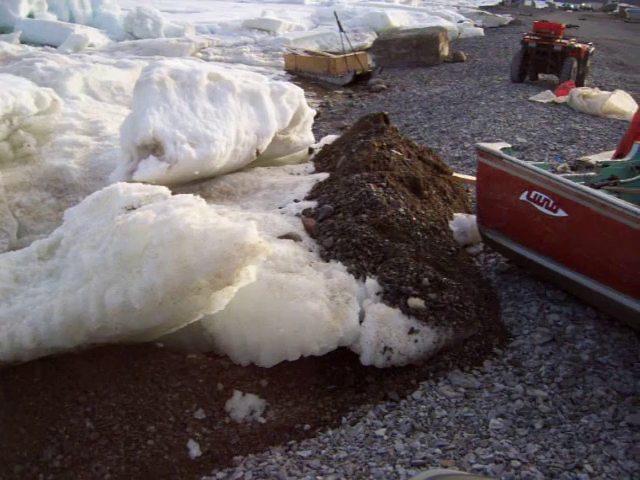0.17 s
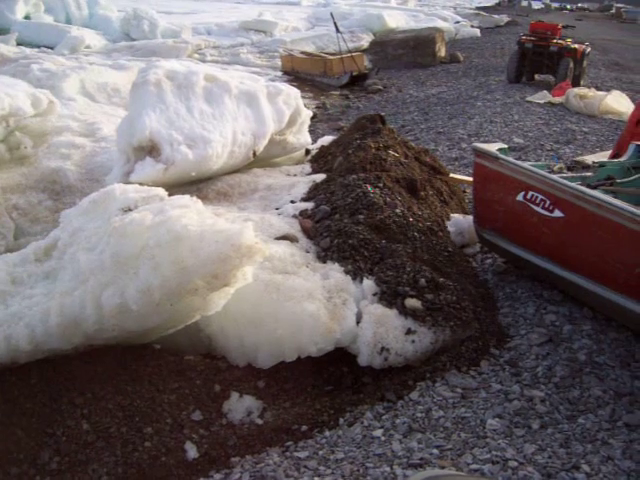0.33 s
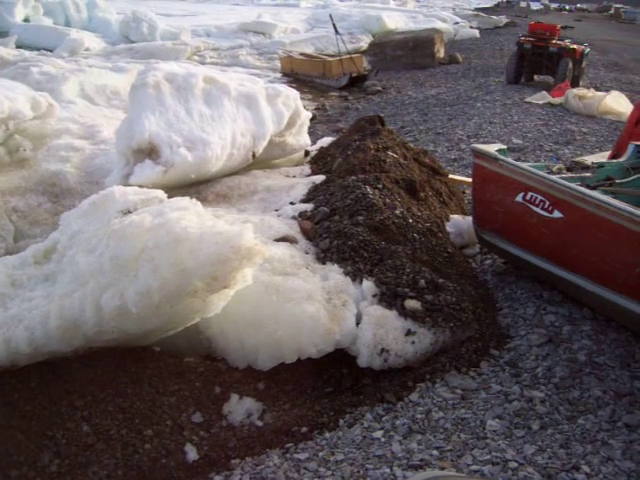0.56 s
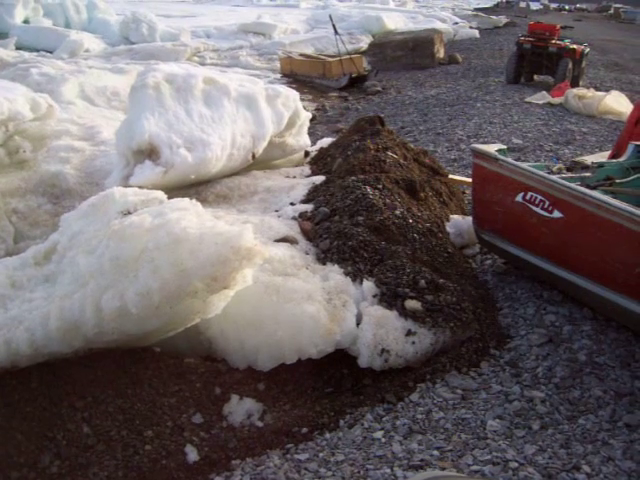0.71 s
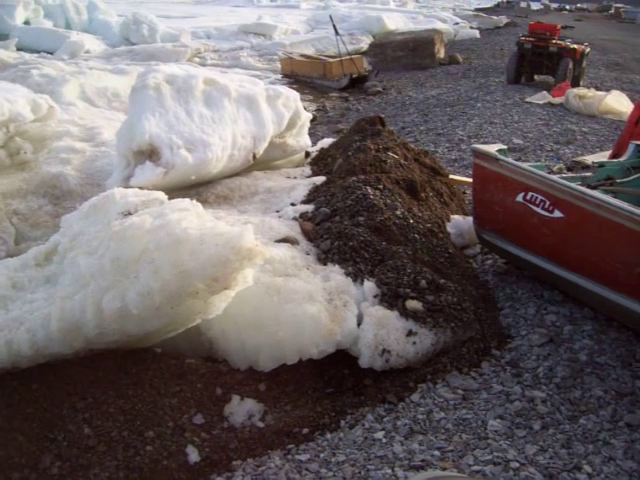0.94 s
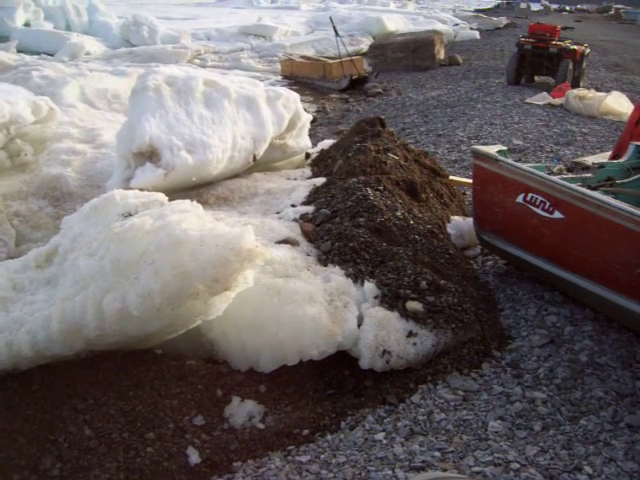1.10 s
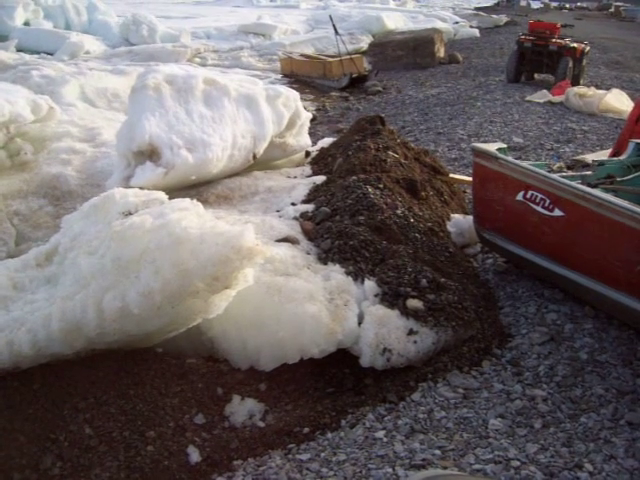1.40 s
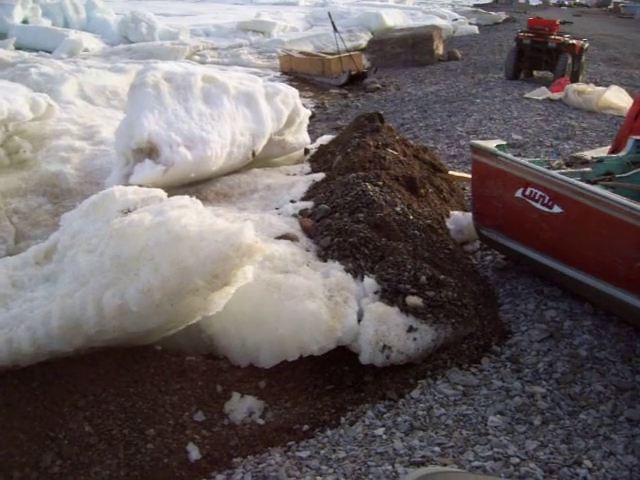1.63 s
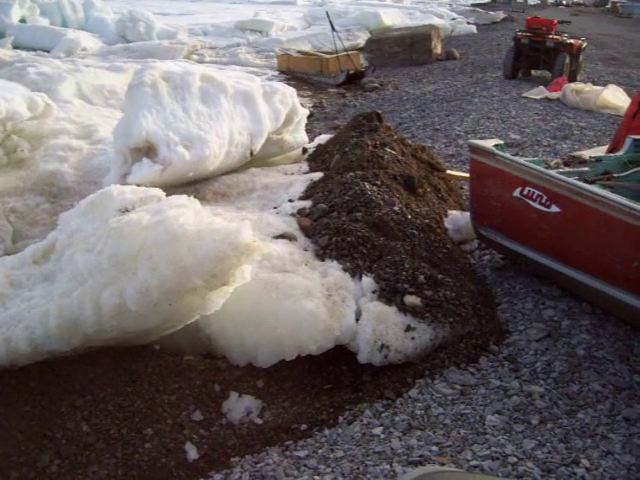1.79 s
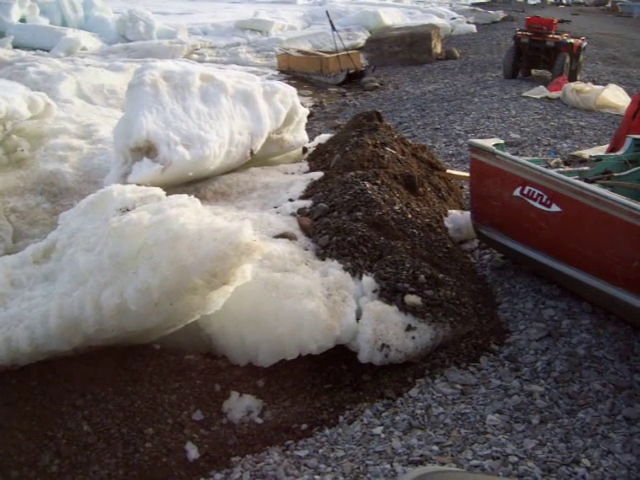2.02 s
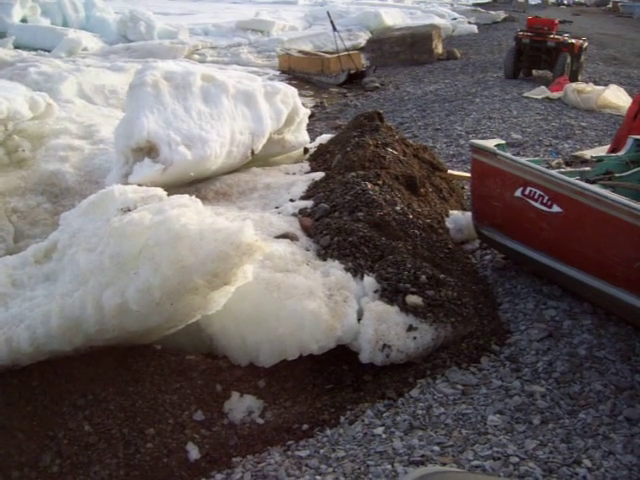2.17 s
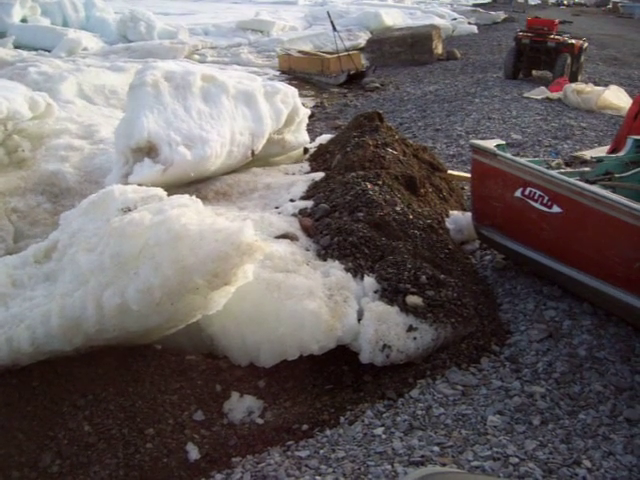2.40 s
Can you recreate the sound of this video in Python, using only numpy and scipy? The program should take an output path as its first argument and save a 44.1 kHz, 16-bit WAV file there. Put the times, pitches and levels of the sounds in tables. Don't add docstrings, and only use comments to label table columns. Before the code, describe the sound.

Gravel shoved by ice grinds and slides throughout, a quiet low rumble under a grainy pebble hiss. Bright small clicks and tiny rattles scatter close by, with soft buried thuds. Scrapes come near 0.9 and 1.25 seconds, a stony crack at 1.34, a sharp click at 1.43, a dull hollow hull knock at 1.64, another sharp click at 1.72, a low thud near 2.3, then sparser ticks until 2.5.

```python
import sys
import numpy as np
from scipy import signal
from scipy.fft import rfft, irfft, next_fast_len
from scipy.io import wavfile
from scipy.ndimage import uniform_filter1d, map_coordinates

SR = 44100
rng = np.random.default_rng(int(sys.argv[2]) if len(sys.argv) > 2 else 0)


def attenuation_scalar(level_db):
    decades = np.asarray(level_db, float) / 20
    return 10 ** decades


def waveform_to_disk(signal):
    frames = np.transpose(np.atleast_2d(signal))
    scaled = np.clip(frames, -1, 1) * 32767
    samples = np.round(scaled).astype(np.int16)
    wavfile.write(sys.argv[1], SR, samples)


N = 112454
SLIDE_STEADY_DB = -41.5


def unit(x):
    return x / np.sqrt(np.mean(x ** 2) + 1e-20)


def wobble(rate_hz):
    return map_coordinates(rng.standard_normal(400), [np.arange(N) * rate_hz / SR])


def filtered(x, response):
    size = next_fast_len(N + 8192)
    spectrum = rfft(x, size) * response(np.fft.rfftfreq(size, 1 / SR))
    return irfft(spectrum, size)[..., :N]


def coloured(x, points):
    point_hz, point_db = np.transpose(points)
    hz = np.fft.rfftfreq(8192, 1 / SR)
    db = np.interp(np.log(hz + 1), np.log(point_hz + 1), np.maximum(point_db, -90))
    cepstrum = irfft(db * np.log(10) / 20)
    cepstrum[1:4096] *= 2
    cepstrum[4097:] = 0
    impulse = irfft(np.exp(rfft(cepstrum)))
    return unit(signal.fftconvolve(x, impulse)[:N])


def contacts(count, spread_db, patchy_db, smooth_db):
    spectrum = signal.stft(rng.standard_normal(N), nperseg=256)[2]
    patches = uniform_filter1d(rng.standard_normal(spectrum.shape), size=6, axis=0)
    patches = uniform_filter1d(patches, size=8, axis=1)
    far = signal.istft(spectrum * attenuation_scalar(patchy_db * unit(patches)), nperseg=256)[1][:N]
    when, way, size = rng.random((count, 3)).T
    push = np.sign(way - .5) * attenuation_scalar(-spread_db * np.log(1 - .98 * size))
    near = np.bincount((when * N).astype(int), push, N)
    return unit(near) + attenuation_scalar(smooth_db) * unit(far)


def rings(s, db, hz, cycles, length):
    turns = np.arange(length) / SR * hz[:, None]
    swell = turns / cycles * np.exp(1 - turns / cycles)
    wave = attenuation_scalar(db)[:, None] * np.sin(2 * np.pi * turns) * swell
    at = np.clip((s * SR).astype(int), 0, N)[:, None] + np.arange(length)
    return np.bincount(at.ravel(), wave.ravel(), N + length + 1)[:N]


def tumble(rows, count, spread, fade_db):
    s, db, hz, length_s = np.transpose(rows)[:, :, None]
    jitter, size, pitch = rng.random((len(rows), count, 3)).transpose(2, 0, 1)
    late = (np.arange(count) + jitter) / count
    tap_db = db - 3 - fade_db * late - 8 * size
    tap_hz = hz * np.exp(spread * (2 * pitch - 1))
    return rings((s + length_s * late).ravel(), tap_db.ravel(), tap_hz.ravel(), cycles=1.7, length=400)


# time in seconds, grinding level in dB, sliding level in dB.
SHOVE_CURVE = [(0.0, -39, -41), (0.13, -39, -42), (0.42, -37, -42), (0.88, -38, -41), (1.11, -37, -39),
               (1.37, -37, -39), (1.47, -36, -39), (1.74, -38, -43), (1.91, -39, -42), (2.13, -39, -41),
               (2.23, -39, -43), (2.55, -38, -43)]
# frequency in Hz, level in dB per Hz.
GRIND_SPECTRUM = [(15, -58), (25, -8), (54, -5), (294, -1.5), (393, -3.5), (497, -6.5), (1160, -12.5),
                  (1900, -22.5), (2470, -55.5), (4180, -120)]
# frequency in Hz, level in dB per Hz.
SLIDE_SPECTRUM = [(880, -29), (1500, -3), (1860, -5), (2280, 0.5), (3490, -1.5), (6150, 0.5), (7470, -6),
                  (8480, -15.5), (8930, -24.5), (11600, -67.5), (19600, -120)]


def gravel():
    s, low, high = np.transpose(SHOVE_CURVE)
    t = np.arange(N) / SR
    shared = .5 * wobble(15)
    grind = coloured(contacts(count=1500, spread_db=3.5, patchy_db=1.0, smooth_db=2.5), GRIND_SPECTRUM)
    slide = coloured(contacts(count=9000, spread_db=5, patchy_db=2.0, smooth_db=-1), SLIDE_SPECTRUM)
    grind_db = np.interp(t, s, low) + 2 + shared + 1.4 * wobble(30.8)
    slide_db = SLIDE_STEADY_DB + 0.45 * (np.interp(t, s, high) - SLIDE_STEADY_DB)
    slide_db = slide_db + shared + .8 * wobble(45)
    return attenuation_scalar(grind_db) * grind + attenuation_scalar(slide_db) * slide


# start in seconds, peak in dB, ring in Hz.
PEBBLE_SNAPS = [(0.4629, -25, 4270), (0.7362, -18.5, 6170), (0.8692, -17, 6300), (1.0332, -22.5, 6100),
                (1.2438, -17.5, 5500), (1.3144, -15, 6500), (1.3972, -16, 5660), (1.4286, -6, 5800),
                (1.477, -13.5, 6460), (1.7152, -6.5, 5800), (1.8095, -15, 6430), (1.923, -18, 5660),
                (2.0477, -22, 5660), (2.1677, -20, 6400)]
# delay in seconds, level in dB, pitch as a ratio.
STONE_ANSWERS = [
    (0, 0, 1),
    (.0008, -8, 1.06),
    (.0018, -17, .9),
    (.003, -19, 1.1),
]


def snaps():
    s, db, hz = np.transpose(PEBBLE_SNAPS)
    out = np.zeros(N)
    for late, loss, ratio in STONE_ANSWERS:
        out += rings(s + 0.0008 + late, db - 1 + loss, hz * ratio, cycles=0.96, length=200)
    return out


# start in seconds, peak in dB, ring in Hz, length in seconds.
PEBBLE_RATTLES = [(0.0203, -21, 7010, 0.006), (0.079, -23.5, 6450, 0.0077), (0.183, -21, 5640, 0.0046),
                  (0.3197, -23, 6430, 0.0081), (0.401, -26.5, 5070, 0.006), (0.462, -17.5, 6520, 0.006),
                  (0.587, -21, 5630, 0.011), (0.672, -21.5, 6870, 0.006), (0.7286, -22.5, 5670, 0.0046),
                  (0.9326, -19.5, 5900, 0.011), (0.973, -22, 5660, 0.0051), (1.1095, -29.5, 6100, 0.006),
                  (1.197, -28.5, 5840, 0.006), (1.303, -15.5, 6250, 0.0081), (1.6435, -15, 6420, 0.01),
                  (1.7755, -27, 5170, 0.006), (1.826, -26.5, 5220, 0.006), (2.014, -25.5, 6170, 0.006),
                  (2.078, -18, 6320, 0.0074), (2.166, -20, 6340, 0.006), (2.24, -24, 6110, 0.0051),
                  (2.2754, -16.5, 5600, 0.006), (2.398, -36, 6390, 0.006), (2.43, -24.5, 6280, 0.012)]


def rattles():
    return tumble(PEBBLE_RATTLES, count=14, spread=0.36, fade_db=12.5)


# start in seconds, peak in dB, ring in Hz, length in seconds.
PEBBLE_SCRAPES = [
    (.906, -21.5, 6000, .038),
    (1.25, -25, 6000, .05),
    (1.352, -32.5, 6000, .025),
    (1.412, -27, 6000, .01),
    (1.455, -41.5, 6500, .02),
    (1.568, -26, 6220, .022),
    (1.955, -29.5, 6000, .025),
    (2.17, -33, 4970, .018),
]


def scrapes():
    return tumble(PEBBLE_SCRAPES, count=50, spread=0.24, fade_db=4.0)


# start in seconds, peak in dB, ring in Hz, length in seconds.
STONE_CRACKS = [(.9645, -27, 2600, .004), (1.195, -30, 2600, .003), (1.335, -22, 5000, .001),
                (1.3361, -11, 5800, .002), (1.3362, -26, 3900, .0015), (1.3363, -24, 1900, .002),
                (1.3364, -12, 2850, .002), (1.4292, -22, 3000, .0008), (1.57, -25, 1300, .01),
                (1.6415, -17, 1100, .01), (1.644, -25, 2500, .006), (1.6445, -21, 5800, .005),
                (1.697, -28, 2600, .003), (1.986, -32, 2600, .006), (2.118, -32, 2400, .006)]


def cracks():
    return tumble(STONE_CRACKS, count=6, spread=0.13, fade_db=6)


# start in seconds, peak in dB, pitch in Hz.
BURIED_SLIPS = [(0.318, -20, 364), (0.619, -21, 270), (0.914, -23, 252), (0.931, -20, 352),
                (0.981, -22.5, 380), (1.219, -36, 400), (1.597, -20, 328), (1.755, -24, 248),
                (1.871, -24, 310), (1.97, -19, 330), (2.233, -22.5, 400), (2.291, -15.5, 350),
                (2.397, -26, 331)]


def thuds():
    s, db, hz = np.transpose(BURIED_SLIPS)
    push = rings(s + 0.0019, db - 2.5, hz, cycles=0.54, length=1500)
    edge = rings(s + 0.00283, db - 6.5, 2.3 * hz, cycles=0.54, length=1500)
    return push - edge


# start in seconds, peak in dB.
HULL_CONTACTS = [
    (1.6408, -17),
    (1.6427, -8),
    (1.6568, -18),
]
# frequency in Hz, level in dB, 60 dB decay in seconds.
HULL_MODES = [(181, 4, 0.037), (272, 2, 0.024), (729, -3, 0.037), (990, -7, 0.047), (1237, -7, 0.024),
              (1690, -29, 0.028), (2270, -16, 0.033), (2780, -15, 0.026)]


def knock():
    out = np.zeros(N + SR)
    t = np.arange(SR // 8) / SR
    damping, attack_s = .8, 0.00083
    ring = np.zeros(len(t))
    for hz, level, t60 in HULL_MODES:
        ring += attenuation_scalar(level - 60 * t / (t60 * damping)) * np.sin(2 * np.pi * hz * t)
    ring *= 1 - np.exp(-t / attack_s)
    for (s, db), way in zip(HULL_CONTACTS, (-1, 1, -1)):
        out[round(s * SR):][:len(t)] += way * attenuation_scalar(db) * ring
    return out[:N]


def crackle(count):
    s, _, high = np.transpose(SHOVE_CURVE)
    when, size, pitch, stretch = rng.random((count, 4)).T
    at = when * N / SR
    faster_db = np.interp(at, s, high) - SLIDE_STEADY_DB
    db = SLIDE_STEADY_DB + 4 + 2 * faster_db - 3 * np.log(1 - .95 * size)
    hz = 6000 * np.exp(.3 * (pitch - .5))
    length_s = .004 * (.3 + 1.4 * stretch)
    return tumble(np.transpose([at, db, hz, length_s]), count=6, spread=0.29, fade_db=3.5)


def pebble_treble(hz):
    return attenuation_scalar(-4 * np.clip(hz - 7060, 0, 4000) / 1000)


def scene():
    taps = snaps() + rattles() + scrapes() + cracks() + crackle(count=500)
    return (gravel() + filtered(taps, pebble_treble) + thuds() + knock())[None]


def microphone(hz):
    bass_cut_hz, top_hz, top_width_hz = 30.4, 9300, 78
    bass = (1j * hz / (bass_cut_hz + 1j * hz)) ** 2
    sag = attenuation_scalar(-.012 * np.clip(hz - 7500, 0, 3000) ** 2 / 1500)
    return bass * sag / (1 + np.exp(np.clip((hz - top_hz) / top_width_hz, -30, 30)))


def roll_off(x):
    return signal.sosfilt(signal.butter(12, 9080, fs=SR, output="sos"), x)


def record(dry):
    mix = filtered(dry, microphone)
    return roll_off(mix)


dry = scene()
out = record(dry)
waveform_to_disk(out)
```